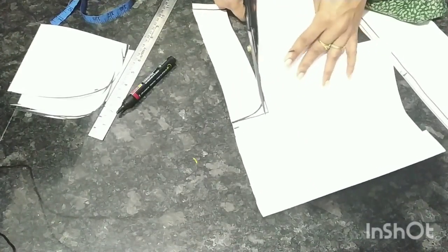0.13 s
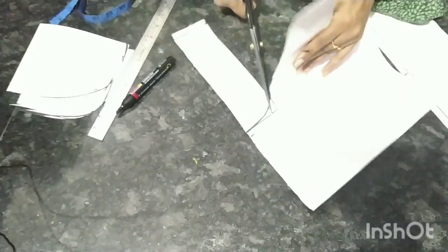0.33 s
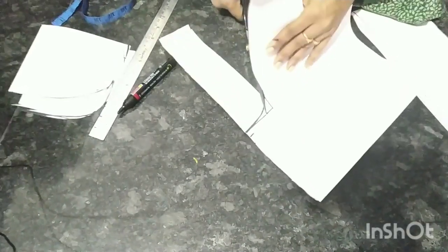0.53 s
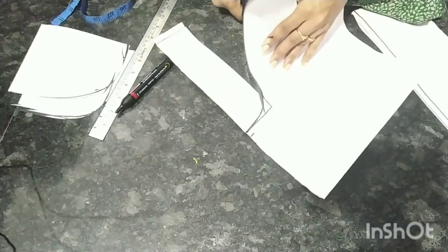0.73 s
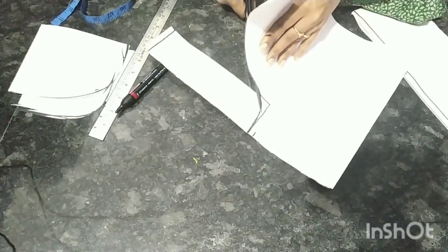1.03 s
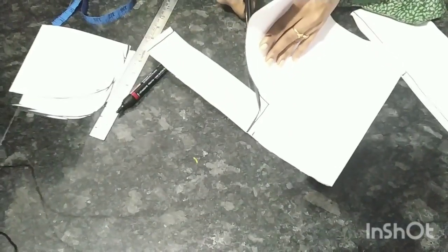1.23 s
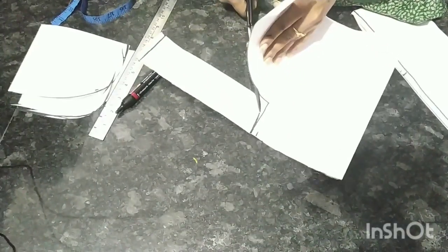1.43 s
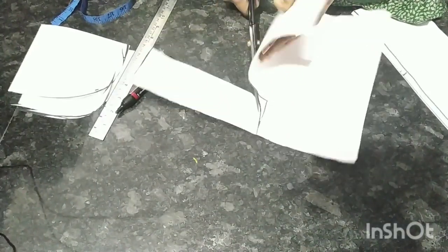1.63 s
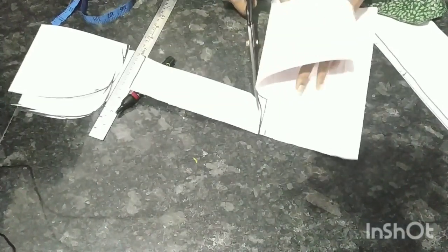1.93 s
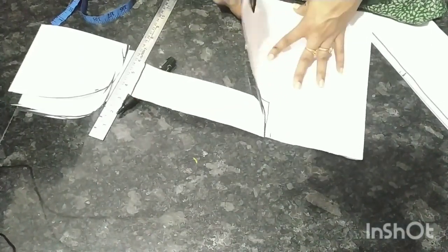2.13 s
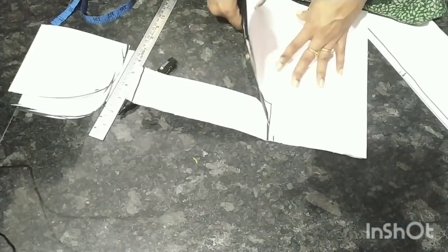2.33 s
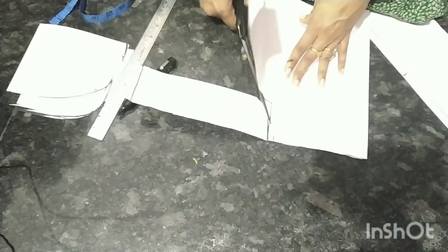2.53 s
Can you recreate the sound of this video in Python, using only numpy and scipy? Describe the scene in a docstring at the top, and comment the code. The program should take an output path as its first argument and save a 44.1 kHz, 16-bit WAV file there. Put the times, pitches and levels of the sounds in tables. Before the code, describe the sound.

Tailor's scissors crunch slowly through a sheet of pattern paper that snaps and rustles on a counter

```python
"""A small room: tailor's scissors work through a sheet of pattern paper on a stone counter.
The sheet swings round, buckles with loud snaps and flops down, while the blades crunch slowly through it;
then the hand lifts, snaps and smooths the paper again. Rustle and crunch are shaped noise and tiny random clicks,
snaps are noise bursts with fading tones, and landings are fading tones.
A low rumble (noise) lies underneath; a faint thin whistle (two pure tones, one wavering) comes in at the end."""
import sys
import numpy as np
from scipy import signal
from scipy.fft import rfft, irfft
from scipy.io import wavfile
from scipy.ndimage import map_coordinates

SR = 44100
rng = np.random.default_rng(int(sys.argv[2]) if len(sys.argv) > 2 else 0)


def bounce(signal):
    """Save signal as a 16-bit WAV file at the path given by the first command-line argument."""
    frames = np.transpose(np.atleast_2d(signal))
    limited = np.clip(frames, -1, 1)
    pcm = np.round(limited * 32767).astype(np.int16)
    wavfile.write(sys.argv[1], SR, pcm)


N = 119070
T = np.arange(N) / SR  # time of every sample, in seconds

# Level of the fibres parting between the blades: (time [s], level [dB])
CUT_LEVEL = [(0, -57.5), (.6, -60), (.73, -65.5), (.8, -58), (.97, -58.5), (1.02, -63.5), (1.075, -66.5),
             (1.095, -56.5), (1.19, -60), (1.23, -68.5), (1.3, -70), (1.34, -57.5), (1.45, -58), (1.5, -55),
             (1.58, -57), (1.7, -61), (1.88, -54.5), (1.98, -56), (2.45, -71), (2.55, -67), (2.62, -97)]
# Tone colour of the crunch: (frequency [Hz], relative level [dB])
CUT_COLOUR = [(200, -12), (500, -29), (900, -10), (1150, -23), (1650, -33), (1850, 0), (2100, 8.5),
              (2450, 3), (3000, 1.5), (4200, -1.5), (5200, 0), (6500, -8.5), (8500, -10.5), (12000, -54),
              (16000, -38)]
# Level of the top treble, from crunch and moving paper together: (time [s], level [dB])
FIZZ_LEVEL = [(0, -70), (.32, -74), (.39, -46.5), (.48, -72), (.53, -53), (.68, -75), (.8, -61), (.96, -67),
              (1.03, -82), (1.15, -77), (1.25, -95), (1.34, -106), (1.42, -66), (1.55, -67), (1.85, -71.5),
              (1.95, -66), (2.0, -76), (2.11, -60), (2.4, -87), (2.52, -110)]
# Tone colour of the top treble: (frequency [Hz], relative level [dB])
FIZZ_COLOUR = [(4000, -32), (7500, -10.5), (9500, 2.5), (12000, 2.5), (16000, -1)]
# How strongly the sheet's two low resonances ring from the cut:
# (time [s], lower level [dB], upper level [dB])
RINGING = [(0, -62, -63.5), (.7, -85, -94), (.8, -70, -65), (.97, -66.5, -66.5), (1.02, -69, -79),
           (1.075, -82, -74), (1.093, -59, -60.5), (1.19, -67, -73), (1.24, -87, -104), (1.315, -91, -90),
           (1.337, -62.5, -72), (1.428, -63, -73), (1.55, -66.5, -81), (1.61, -79, -71), (1.69, -71, -55),
           (1.76, -52.5, -57), (1.86, -78, -62), (1.92, -88, -68), (1.979, -78, -77), (2.07, -60, -52.5),
           (2.16, -68, -57.5), (2.38, -51, -64), (2.52, -93, -61), (2.6, -101, -101)]
LOWER_HZ, LOWER_WIDTH_HZ = 751, 103
UPPER_HZ, UPPER_WIDTH_HZ = 1373, 147
FIBRES_PER_S, FIBRE_SPREAD_DB = 1800, 2.5
CLUMP_DB, CLUMP_HZ = 2.5, 71  # how unevenly the fibres break, and the fastest rate of change
CATCH_DB, CATCH_HZ = 3, 27.7  # the ringing comes in fits

# Sharp ticks of blades and paper edge:
# (start [s], level [dB], fade time [s], treble relative to level [dB], pitch [Hz])
TICKS = [(.005, -52, 0.0027, 20, 2180), (0.452, -40, 0.005, 0.5, 1860), (0.565, -45, 0.0018, 4, 2200),
         (0.835, -44.5, 0.0046, 1.5, 3100), (0.884, -52.5, 0.0053, 4, 3250),
         (1.051, -44, 0.0048, -3.5, 2680), (1.09, -45.5, 0.0027, -16, 2880),
         (1.136, -44.5, 0.0022, -21, 2930), (1.181, -48, 0.0066, -7, 2500),
         (1.316, -50.5, 0.0045, -26, 2800), (1.493, -45, 0.004, 5, 2050), (1.53, -43.5, 0.0058, 4, 1970),
         (1.61, -38.5, 0.0028, -2, 3550), (1.766, -35.5, 0.0025, -17, 1900), (2.004, -36, 0.006, -12, 2600),
         (2.031, -35, 0.0058, -15, 2020), (2.092, -37, 0.0039, -6, 2780), (2.179, -49, 0.002, 16, 2600),
         (2.494, -35.5, 0.0052, -30, 2140)]
TICK_WIDTH_HZ, TICK_BAND_HZ = 530, [1360, 3850]  # width of the ring; edges of the broad crack
TICK_RING_DB, TICK_BROAD_DB = -4, -6.5  # added to the listed tick level

# The sheet buckles: (start [s], crack level [dB], crack fade time [s], treble relative to crack [dB],
# pop pitch [Hz], pop level [dB], time for the pop to fall 60 dB [s])
SNAPS = [(0.187, -75, .002, -6, 770, -46.5, 0.12), (0.3202, -44, 0.0028, 5, 620, -28.5, 0.074),
         (0.3276, -28, 0.0048, 1, 568, -22.5, 0.032), (0.3301, -30.5, 0.00063, -20, 644, -22, 0.035),
         (0.3315, -13, 0.00045, -21, 500, -51, 0.025), (0.426, -24, 0.0018, -10.5, 1085, -26, 0.006),
         (.514, -28, 0.0024, 4, 507.5, -21.5, 0.039), (0.5177, -41, 0.0027, -16, 1313, -32.5, 0.076),
         (2.2148, -17.5, 0.00042, -22, 2170, -24, 0.012), (2.22, -54, 0.0022, -8, 368, -32, 0.069)]
CRACK_LOW_HZ, CRACK_HIGH_HZ = 1000, 5500
SIDE_DB = -12  # level of the snaps' treble added with opposite sign left and right

# Paper sliding and rustling: (peak time [s], rise [s], fall [s], level of the middle range [dB],
# body relative to middle, before BODY_DB [dB], top relative to middle, before TOP_DB [dB])
RUSTLES = [(.004, 0.023, 0.023, -51.5, 15.5, 11.5), (.065, 0.014, 0.011, -52.5, 8.5, 4),
           (0.12, 0.028, 0.022, -51.5, -15, 7.5), (0.225, 0.011, 0.021, -44, -20, 2),
           (.315, 0.089, 0.036, -52.5, 6, 2.5), (0.347, 0.018, 0.084, -45.5, 6.5, 2.5),
           (.386, 0.0077, 0.011, -36, -8, 0), (0.411, 0.012, 0.02, -37, -2.5, -0.5),
           (.485, 0.09, 0.036, -60, 18.5, -1), (0.522, 0.011, 0.013, -39.5, 3, 6),
           (0.554, 0.025, 0.021, -39.5, 8, 6), (0.595, 0.023, 0.045, -48, 10, 7),
           (0.767, 0.01, 0.036, -51.5, -36, 7), (.90, 0.014, 0.07, -57, -19, 5),
           (1.68, 0.067, 0.086, -54.5, -19, 7), (1.765, 0.07, 0.034, -43, 7, 3),
           (2.066, 0.026, 0.018, -46.5, 2, -3.5), (2.109, 0.013, 0.035, -44.5, -10, 5),
           (2.208, 0.028, 0.021, -36, 1, 2), (2.244, 0.014, 0.024, -44, 7, 7.5),
           (2.327, 0.043, 0.028, -43, 4, 7.5), (2.373, 0.058, 0.059, -40.5, 8, -1),
           (2.52, 0.04, 0.064, -61, -3, -15)]
# Tone colours of the rustle's three ranges: (frequency [Hz], relative level [dB])
RUSTLE_BODY = [(200, 0.5), (450, -16), (650, -1), (780, -1.5), (1000, 4.5), (1350, 11.5), (1650, 4.5),
               (2100, -1.5), (4000, -117)]
RUSTLE_MID = [(900, -39), (1550, -11), (1950, 5), (2900, 4), (3900, -1.5), (5300, 0), (6800, -7.5),
              (9000, -28), (16000, -72)]
RUSTLE_TOP = [(3500, -81), (6000, -4.5), (7600, 2.5), (9600, 0.5), (10800, -5.5), (15500, -11)]
BODY_DB, TOP_DB = -13.5, -11.5
GRAINS_PER_S, GRAIN_SPREAD_DB = 11000, 3.5
CRACKLE_DB, CRACKLE_HZ = 0.5, 220  # sliding paper sticks and slips
SWELL_SHAPE = 1.63  # higher means a rounder peak and a steeper fall

# The loose sheet flaps and drums:
# (peak time [s], rise [s], fall [s], pitch [Hz], width [Hz], level [dB])
FLAPS = [(.01, 0.024, 0.064, 567, 428, -57), (.132, 0.014, 0.052, 586, 332, -49.5),
         (0.165, 0.0055, 0.009, 685, 263, -51.5), (0.24, 0.025, 0.029, 614, 189, -47.5),
         (.29, 0.045, 0.083, 530, 197, -50), (0.338, 0.0053, 0.0081, 557, 256, -37),
         (0.364, 0.043, 0.072, 513, 526, -42.5), (0.522, 0.0098, 0.014, 427, 274, -40.5),
         (0.554, 0.046, 0.065, 490, 480, -48), (0.751, 0.0017, 0.038, 620, 384, -53),
         (0.769, 0.0046, 0.082, 242, 128, -51), (1.094, 0.0072, 0.048, 530, 270, -60.5),
         (1.684, 0.006, 0.014, 463, 380, -56), (1.745, 0.062, 0.1, 272, 62.6, -56),
         (2.097, 0.052, 0.04, 260, 88, -47.5), (2.223, 0.017, 0.05, 720, 586, -43.5),
         (2.23, 0.011, 0.051, 364, 172, -45.5), (2.50, 0.0074, 0.034, 948, 127, -56.5)]

# The sheet flops onto the counter: (time [s], level [dB])
KNOCKS = [(.751, -40.5), (.7595, -38.5)]
# What each landing rings with:
# (pitch [Hz], level relative to landing [dB], time to fall 60 dB [s])
KNOCK_MODES = [(220, -6, 0.12), (269.6, -3, 0.26), (345, -8, 0.094), (570, -8.5, 0.046), (752, -10, 0.13),
               (890, -18, 0.069)]

# Hands and scissors bump the counter: (peak time [s], rise [s], fall [s], level [dB])
BUMPS = [(.08, .03, 0.049, -52), (.255, 0.071, 0.06, -51), (.76, 0.017, 0.019, -55),
         (.88, 0.21, 0.083, -53), (1.17, 0.067, 0.03, -60), (1.365, 0.031, 0.019, -51.5),
         (1.45, 0.05, 0.012, -52.5), (2.35, 0.36, 0.34, -58), (2.656, 0.042, 0.029, -51)]
# Tone colour of the bumps: (frequency [Hz], relative level [dB])
BUMP_COLOUR = [(25, 7), (50, 0.5), (78, 13), (105, 3), (150, 0.5), (220, -24), (400, -53)]

# The moving sheet's reflection in the counter: mean delay, wander, pace of the wander, strength
BOUNCE_S, BOUNCE_WANDER_S, BOUNCE_HZ, BOUNCE_GAIN = 0.00121, 0.000223, 6.9, 0.62
ROOM_T60_S, ROOM_DB, ROOM_TOP_HZ = 0.3, -16.5, 5760

# Tone colour of the low rumble: (frequency [Hz], relative level [dB])
RUMBLE_COLOUR = [(20, 2.5), (45, 0), (62, 0), (80, 1.5), (105, -15.5), (150, -12.5), (260, -12.5),
                 (500, -19), (2000, -40.5), (5500, -33), (11000, -52)]
RUMBLE_DB = -64
# A thin squeak: (time [s], pitch [Hz], level [dB])
SQUEAK = [(2.54, 5330, -110), (2.565, 5270, -74), (2.665, 5340, -69), (2.695, 5100, -68.5)]
WAVER_HZ, WAVERS_PER_S = 85, 31  # how far and how often the squeak's pitch wavers
WHINE_HZ, WHINE_DB, WHINE_START_S = 11832, -82, 2.51
CUTOFF_HZ = 15900


def cutting():
    """Fibres break in clumps between the blades and set the sheet ringing; top treble is added."""
    clumps = from_db(CLUMP_DB * slow(CLUMP_HZ))
    fibres = clumps * (grains(FIBRES_PER_S, FIBRE_SPREAD_DB) + 0.51 * rng.standard_normal(N))
    crunch = level_over_time(CUT_LEVEL) * colour(over_counter(fibres), CUT_COLOUR)
    fizz = level_over_time(FIZZ_LEVEL) * colour(over_counter(fibres), FIZZ_COLOUR)

    s, lower_db, upper_db = np.transpose(RINGING)
    lower_push = fibres * from_db(CATCH_DB * slow(CATCH_HZ))
    upper_push = fibres * from_db(CATCH_DB * slow(CATCH_HZ))
    lower = from_db(np.interp(T, s, lower_db)) * resonate(lower_push, LOWER_HZ, LOWER_WIDTH_HZ)
    upper = from_db(np.interp(T, s, upper_db)) * resonate(upper_push, UPPER_HZ, UPPER_WIDTH_HZ)
    return crunch + fizz + lower + upper


def ticks():
    """Each tick is a broad crack and a brief ring at its own pitch."""
    rings, broad_rows = 0, []
    for s, db, length_s, treble_db, hz in TICKS:
        band = [hz - TICK_WIDTH_HZ / 2, hz + TICK_WIDTH_HZ / 2]
        rings = rings + from_db(db) * butter(burst(s, length_s), band, "band")
        # lower the middle band only: the treble keeps its level
        broad_rows.append((s, db + TICK_BROAD_DB, length_s, treble_db - TICK_BROAD_DB))
    broad = butter(cracks(broad_rows, *TICK_BAND_HZ), 1200, "high")
    return broad + from_db(TICK_RING_DB) * np.sqrt(SR / 2 / TICK_WIDTH_HZ) * rings


def snap_cracks():
    """The sharp, noisy part of each buckle."""
    return cracks([row[:4] for row in SNAPS], CRACK_LOW_HZ, CRACK_HIGH_HZ)


def snaps():
    """Each buckle is a crack and a short pop of the sheet, a tone that dies away."""
    out = snap_cracks()
    for s, _, _, _, hz, db, t60 in SNAPS:
        out = out + ring(s, hz, db, t60)
    return out


def rustle():
    """Paper drags over stone and skin: dense tiny slips, fuller or brighter from move to move."""
    body, mid, top = 0, 0, 0  # power in each range
    for s, rise_s, fall_s, db, body_db, top_db in RUSTLES:
        power = (from_db(db) * swell(s, rise_s, fall_s)) ** 2
        body = body + power * from_db(body_db) ** 2
        mid = mid + power
        top = top + power * from_db(top_db) ** 2
    slips = from_db(CRACKLE_DB * slow(CRACKLE_HZ)) * grains(GRAINS_PER_S, GRAIN_SPREAD_DB)
    top_slips = grains(GRAINS_PER_S, GRAIN_SPREAD_DB)
    body_sound = from_db(BODY_DB) * np.sqrt(body) * colour(slips, RUSTLE_BODY)
    mid_sound = np.sqrt(mid) * colour(over_counter(slips), RUSTLE_MID)
    top_sound = from_db(TOP_DB) * np.sqrt(top) * colour(over_counter(top_slips), RUSTLE_TOP)
    return body_sound + mid_sound + top_sound


def flaps():
    """The moving sheet drums: swells of noise, each at its own listed pitch."""
    out = 0
    for s, rise_s, fall_s, hz, width_hz, db in FLAPS:
        shape = swell(s, rise_s, fall_s)
        drumming = rms_one(shape * resonate(rng.standard_normal(N), hz, width_hz))
        out = out + from_db(db) * np.sqrt(np.mean(shape ** 2)) * drumming
    return out


def knocks():
    """Each landing strikes all the low modes, which ring and fade."""
    out = 0
    for s, db in KNOCKS:
        for hz, mode_db, t60 in KNOCK_MODES:
            out = out + ring(s, hz, db + mode_db, t60)
    return out


def bumps():
    """Soft, dull knocks through the counter: swells of low noise."""
    power = 0
    for s, rise_s, fall_s, db in BUMPS:
        power = power + (from_db(db) * swell(s, rise_s, fall_s)) ** 2
    return np.sqrt(power) * colour(rng.standard_normal(N), BUMP_COLOUR)


def over_counter(x):
    """A close reflection whose delay wanders as the sheet moves, sweeping fine notches through the sound."""
    pace = [(1, 0), (BOUNCE_HZ, 0), (4 * BOUNCE_HZ, -40), (40 * BOUNCE_HZ, -160)]
    delay_s = BOUNCE_S + BOUNCE_WANDER_S * colour(rng.standard_normal(N), pace)
    echo = map_coordinates(x, [(T - delay_s) * SR], order=3)
    return (x + BOUNCE_GAIN * echo) / np.hypot(1, BOUNCE_GAIN)


def room(x):
    """A short, slightly dull tail from the walls: fading noise, starting after 4 ms."""
    age = T[:SR // 2]
    tail = butter(rng.standard_normal(len(age)), [200, ROOM_TOP_HZ], "band", order=1)
    tail = tail * from_db(-60 * age / ROOM_T60_S) * (age > .004)
    return from_db(ROOM_DB) * signal.fftconvolve(x, tail / np.sqrt(np.sum(tail ** 2)))[:N]


def background():
    """Low room rumble from noise; at the end a faint wavering squeak and a steady high whine."""
    rumble = from_db(RUMBLE_DB) * colour(rng.standard_normal(N), RUMBLE_COLOUR)
    s, hz, db = np.transpose(SQUEAK)
    pitch = np.interp(T, s, hz) + WAVER_HZ * np.sin(2 * np.pi * WAVERS_PER_S * T)
    tone = np.sin(2 * np.pi * np.cumsum(pitch) / SR)
    squeak = from_db(np.interp(T, s, db)) * tone * (1 + 0.72 * slow(200))  # uneven loudness
    whine = from_db(WHINE_DB) * np.sin(2 * np.pi * WHINE_HZ * T) * (T > WHINE_START_S)
    return rumble + squeak + whine


def cracks(rows, low_hz, high_hz):
    """Bursts in a middle band, each with its own share of treble."""
    middle, treble = 0, 0
    for s, db, length_s, treble_db in rows:
        middle = middle + from_db(db) * burst(s, length_s)
        treble = treble + from_db(db + treble_db) * burst(s, length_s)
    # make up for the power that the band filter takes away
    middle = np.sqrt(SR / 2 / (high_hz - low_hz)) * butter(middle, [low_hz, high_hz], "band")
    return middle + 1.15 * butter(butter(treble, 2700, "high"), 6100, "low", order=1)


def burst(s, length_s):
    """A spray of slips that starts sharply and dies within milliseconds."""
    age = np.clip((T - s) / length_s, 0, 40)
    fade = 1.2 * (1 - np.exp(-age / .1)) * np.exp(-age)
    return rms_one(np.tanh(rng.standard_normal(N)) * fade) * np.sqrt(np.mean(fade ** 2))


def ring(s, hz, db, t60):
    """A pure tone that starts at s and falls 60 dB in t60 seconds."""
    age = np.maximum(T - s, 0)
    return from_db(db - 60 * np.minimum(age / t60, 2)) * np.sin(2 * np.pi * hz * age)


def grains(per_s, spread_db):
    """Random tiny slips: many small, few large."""
    sizes = from_db(spread_db * np.minimum(rng.exponential(1, N), 5)) * rng.choice([-1, 1], N)
    return rms_one(sizes * (rng.random(N) < per_s / SR))


def swell(peak_s, rise_s, fall_s):
    """A movement that grows to its peak and dies away."""
    width_s = np.where(T < peak_s, rise_s, fall_s)
    return np.exp(-np.abs((T - peak_s) / width_s) ** SWELL_SHAPE)


def slow(hz):
    """Smooth chance: noise with only the changes slower than about hz; unit spread."""
    return rms_one(butter(rng.standard_normal(N), hz, "low"))


def colour(x, points):
    """Give a steady texture a spectrum; unit power."""
    hz, db = np.transpose(points)
    f = np.maximum(np.fft.rfftfreq(N, 1 / SR), 1)
    gain = from_db(np.interp(np.log(f), np.log(hz), db))
    return rms_one(irfft(rfft(x) * gain, N))


def resonate(x, hz, width_hz, order=2):
    """A texture through one resonance; unit power."""
    high = np.hypot(hz, width_hz / 2) + width_hz / 2
    return rms_one(butter(x, [high - width_hz, high], "band", order=order))


def butter(x, hz, kind, order=2):
    """A filter that keeps low, high or middle frequencies (Butterworth)."""
    sos = signal.butter(order, np.clip(hz, 10, .45 * SR), kind, fs=SR, output="sos")
    return signal.sosfilt(sos, x + 1e-18)


def level_over_time(points):
    """A gain that moves in straight decibel lines between (time, level) points."""
    return from_db(np.interp(T, *np.transpose(points)))


def from_db(db):
    """Decibels to gain."""
    return 10 ** (np.asarray(db) / 20)


def rms_one(x):
    """Scale to unit power."""
    return x / np.sqrt(np.mean(x ** 2) + 1e-20)


def scene():
    """Everything sits in the centre, plus snap treble added with opposite sign left and right."""
    dry = cutting() + ticks() + snaps() + rustle() + flaps() + knocks() + bumps()
    side = from_db(SIDE_DB) * butter(snap_cracks(), 6200, "high", order=8)
    return dry + room(dry) + background() + side * np.array([[1], [-1]])


def record(dry):
    """The top is cut steeply."""
    return signal.sosfilt(signal.ellip(10, .2, 80, CUTOFF_HZ, fs=SR, output="sos"), dry)


dry = scene()
out = record(dry)
bounce(out)
```